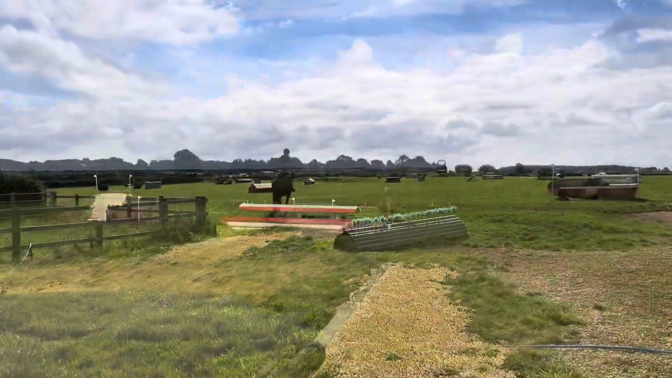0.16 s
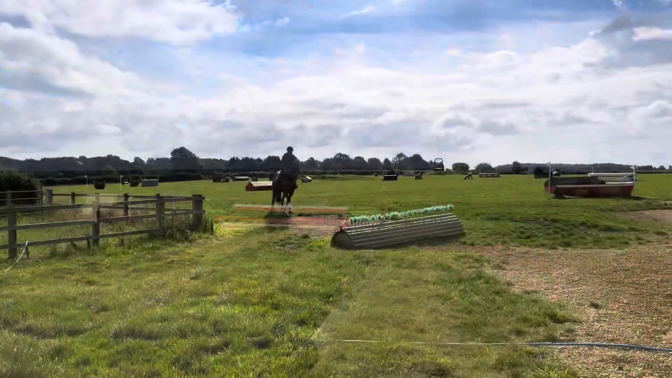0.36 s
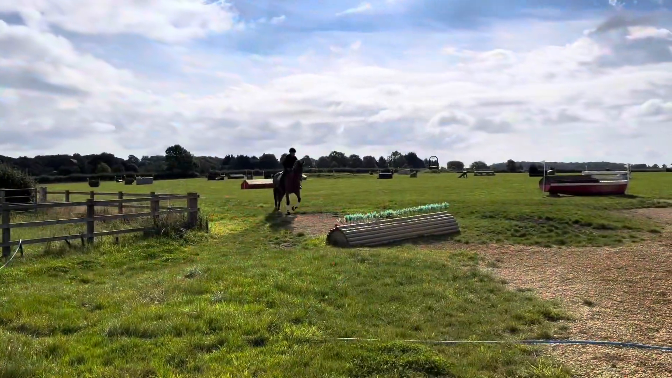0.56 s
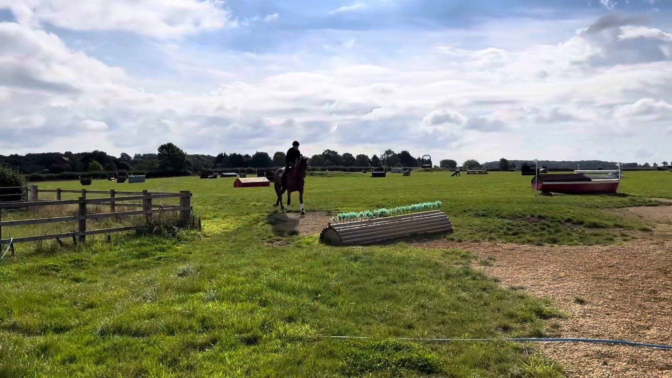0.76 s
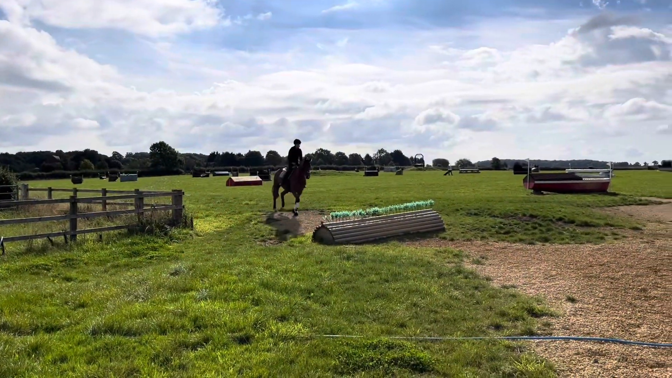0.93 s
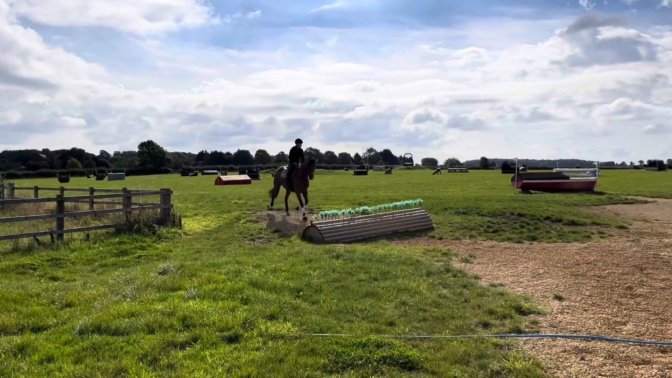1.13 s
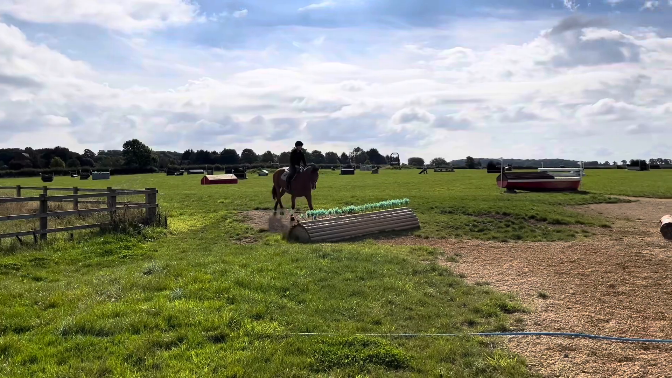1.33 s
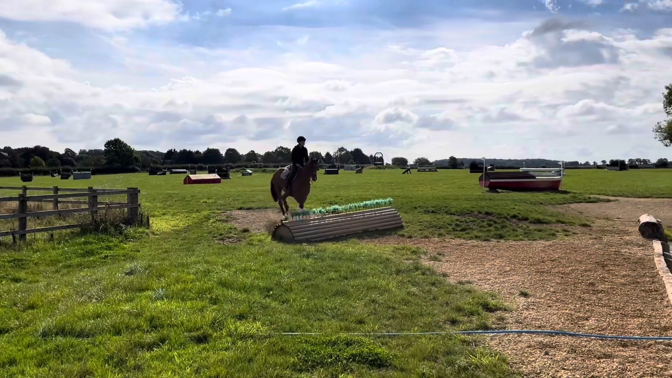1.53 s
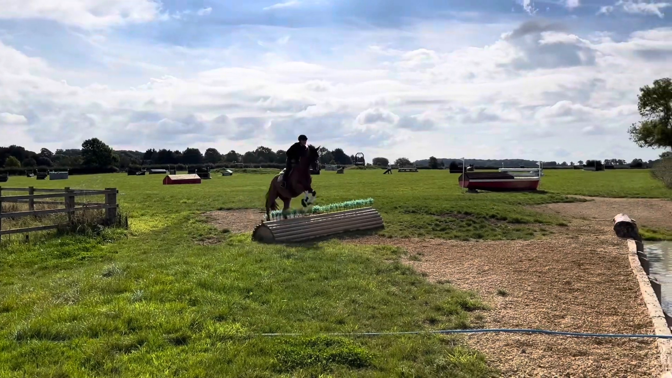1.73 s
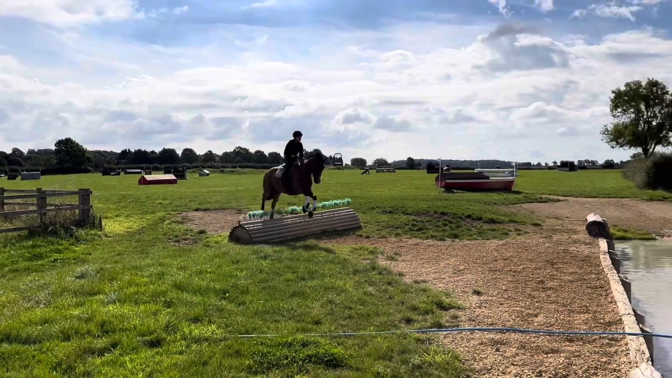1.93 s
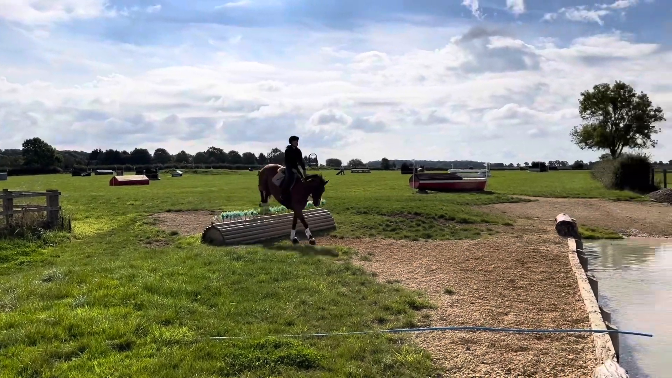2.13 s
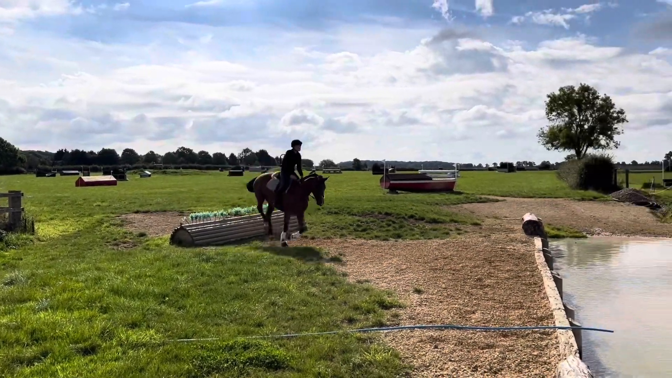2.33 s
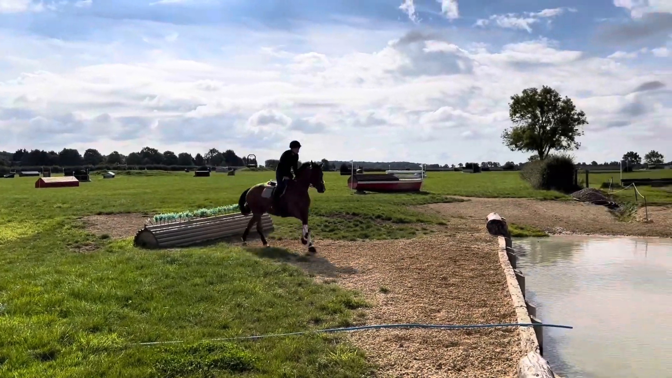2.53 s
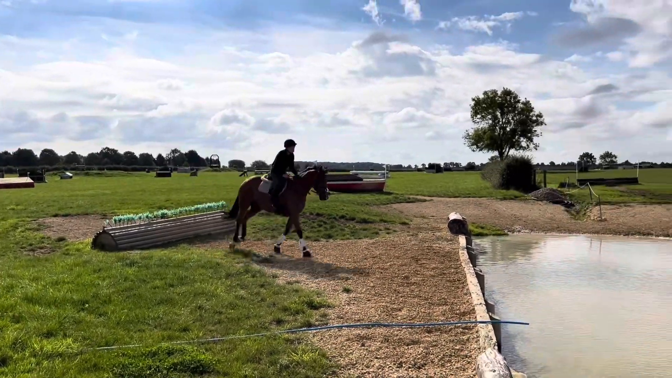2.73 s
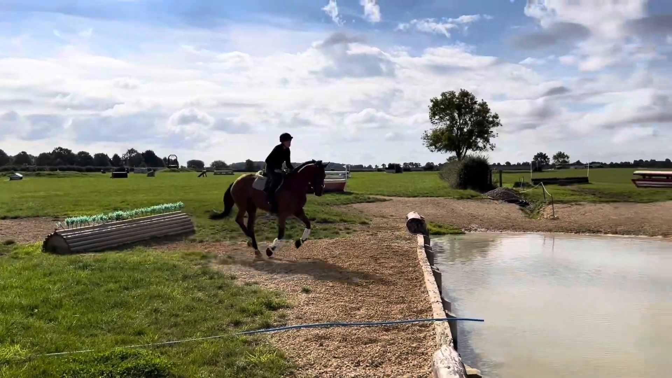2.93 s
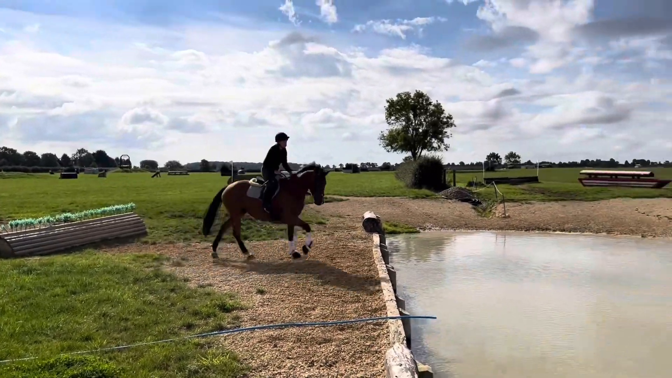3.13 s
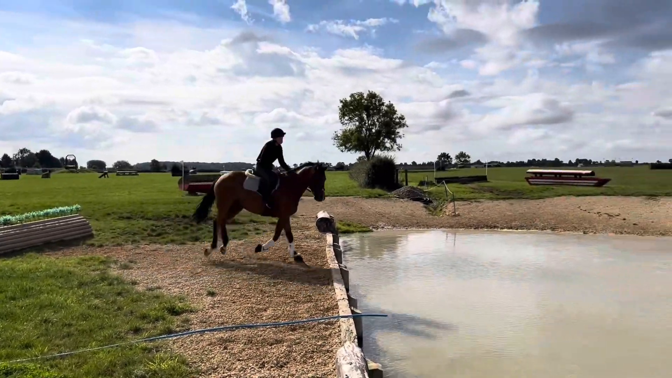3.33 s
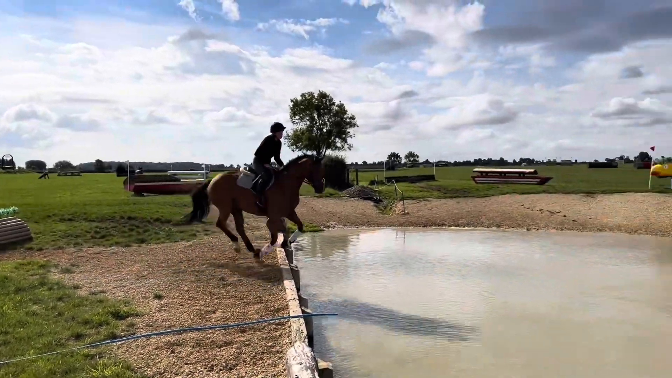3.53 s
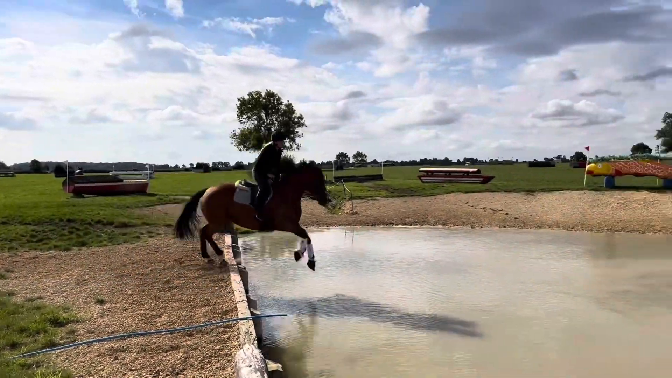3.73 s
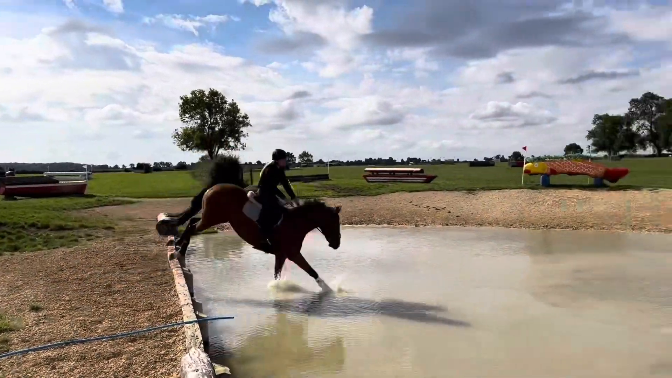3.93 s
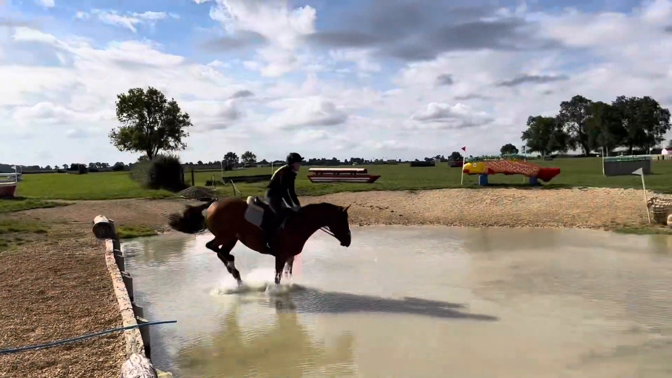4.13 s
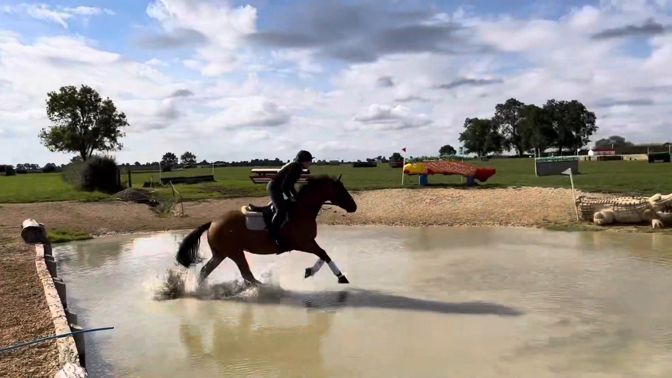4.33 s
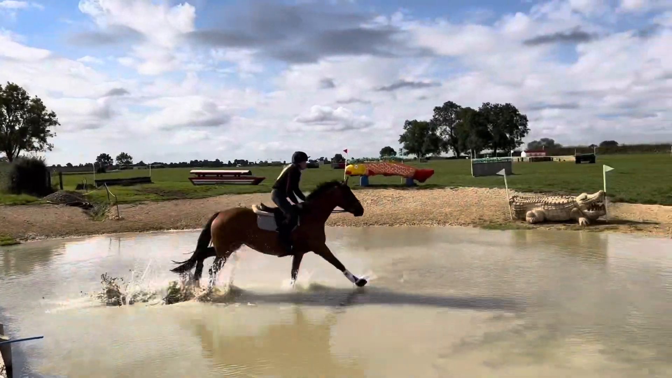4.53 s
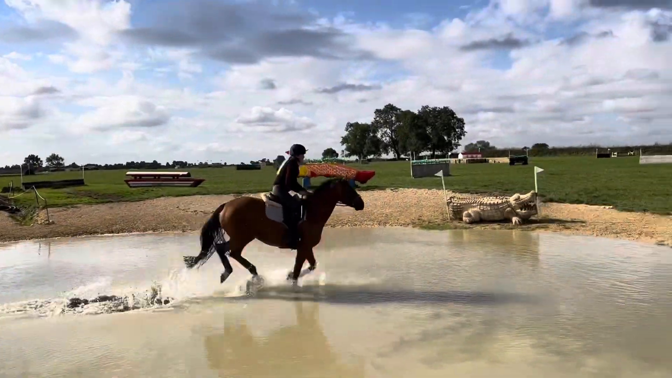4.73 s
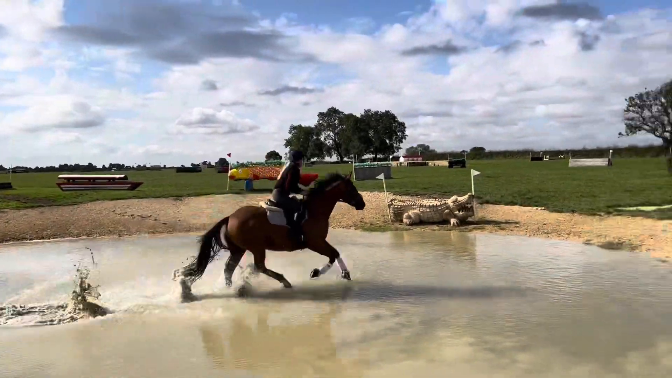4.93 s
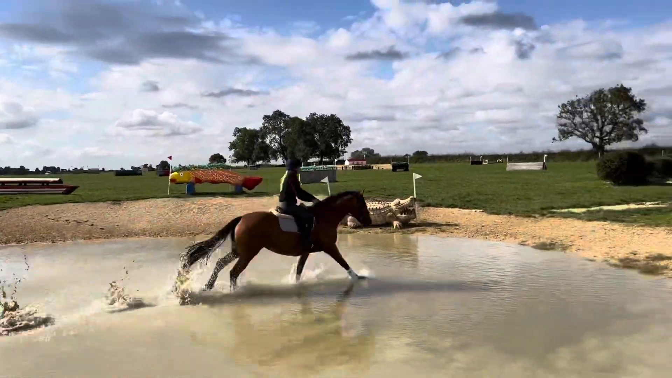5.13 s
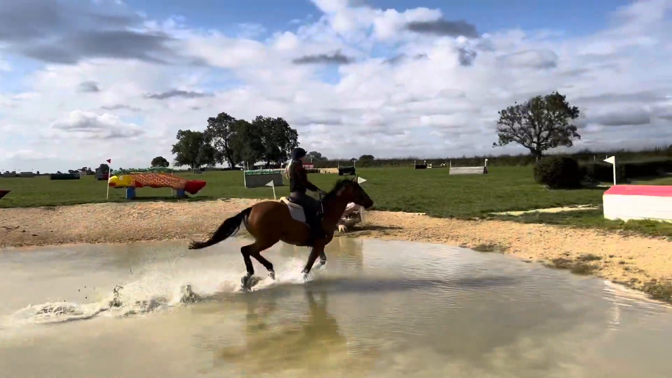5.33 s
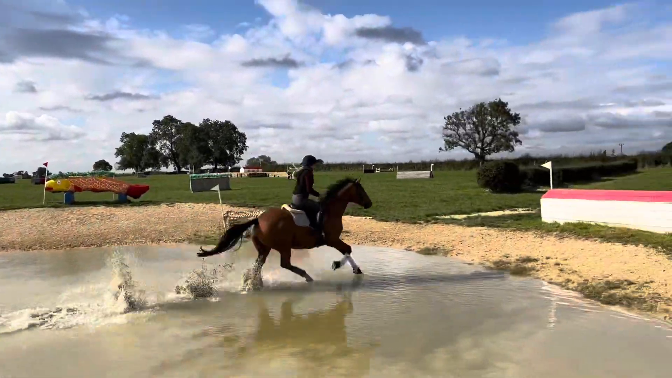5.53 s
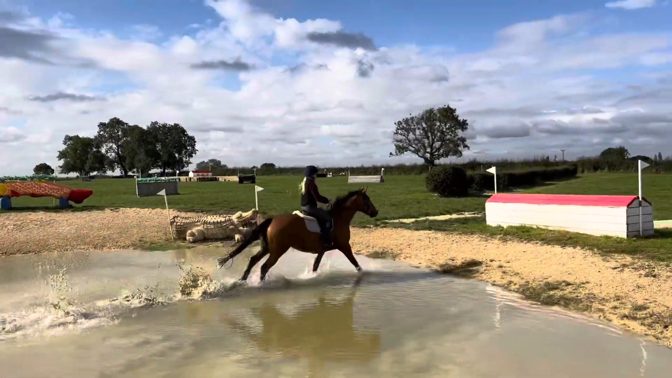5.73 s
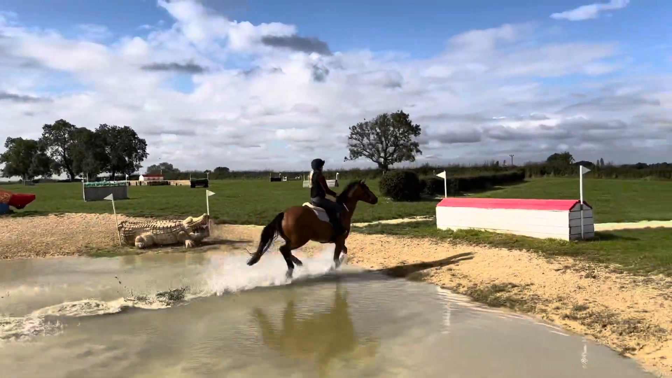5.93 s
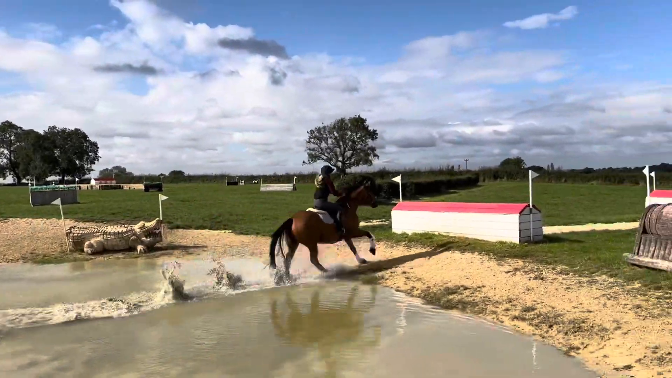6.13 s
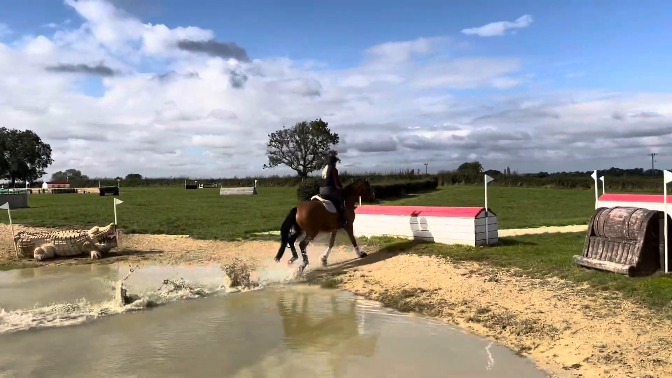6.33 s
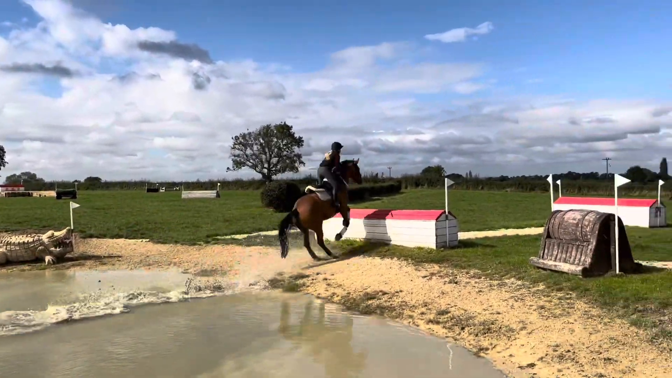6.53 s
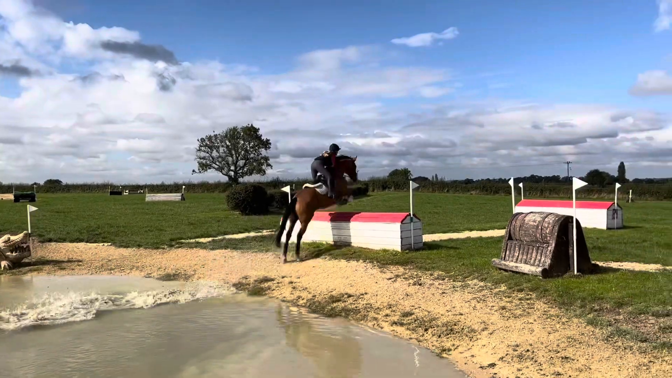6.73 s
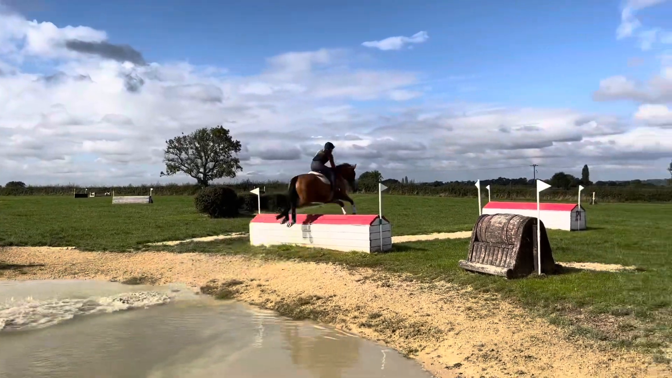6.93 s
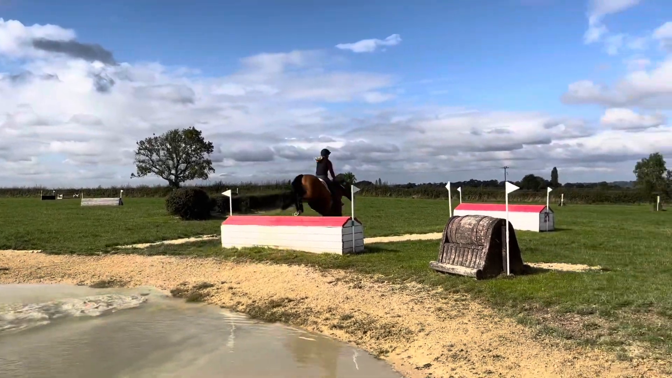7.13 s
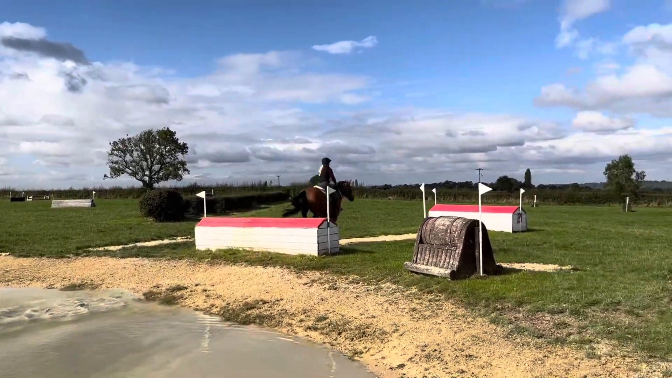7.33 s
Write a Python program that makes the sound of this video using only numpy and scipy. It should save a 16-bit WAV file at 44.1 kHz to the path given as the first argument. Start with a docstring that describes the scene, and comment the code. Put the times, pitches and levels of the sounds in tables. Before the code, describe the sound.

Open air, close wind on a stereo microphone, soft hiss behind. From 0.2 to 1 s low wind flutters and pops. Faint hoofbeats begin around 0.9 s, irregular thuds, dull clops and gravel crunch, with tiny ticks and faint short snorts near 1.5 and 2.2 s. The steps get firmer from 2 to 3.6 s, with loose stones trickling and a sharp click at 3.4 s. A heavy stamp at 3.7 s is followed by a dry, hard timber rap at 3.87 s, then water entry. From 3.95 to 6.3 s hooves crack and slap the shallow pond, air pockets gulp, churned water bubbles and spray patters back continuously. A powerful rumbling gust hits at 5.4-5.9 s, with smaller buffets after 6.3 s. Splashing thins from 6.5 s, droplets die by 7 s, and light hoofbeats land at 7.2 and 7.4 s with a faint snort between.

```python
"""A horse canters over turf and gravel, raps a timber edge, splashes through a shallow pond and leaves it.
Hooves are shaped noise and resonant knocks; stones, drops and bubbles are dense random grains.
On the water each hoof cracks and thumps, air pockets gulp, and spray rains back.
Small sharp clicks are short band-passed snaps; snorts are puffs of noise with a fluttering whistle.
Gusts of wind buffet the microphone as low noise, eddies and pops, over a soft background hiss."""
import sys
import numpy as np
from scipy import signal
from scipy.fft import rfft, irfft, next_fast_len
from scipy.io import wavfile
from scipy.ndimage import uniform_filter1d, map_coordinates

SR = 44100
rng = np.random.default_rng(int(sys.argv[2]) if len(sys.argv) > 2 else 0)


def bounce(signal):
    """Save signal as a 16-bit WAV file at the path given by the first command-line argument."""
    frames = np.transpose(np.atleast_2d(signal))
    limited = np.clip(frames, -1, 1)
    pcm = np.round(limited * 32767).astype(np.int16)
    wavfile.write(sys.argv[1], SR, pcm)


N = 329868  # length [samples]
TOP_HZ = 15500  # upper band limit


def amp(db):
    """Level: decibels become a linear amplitude ratio."""
    return 10 ** (np.asarray(db) / 20)


def unit(x):
    """Normalisation: x is scaled to rms 1."""
    return x / np.sqrt(np.mean(x ** 2) + 1e-20)


def along(points, hz):
    """Logarithmic pitch scale: (frequency, value) points are interpolated over log frequency."""
    f, v = np.transpose(points)
    return np.interp(np.log(hz + 1), np.log(f + 1), v)


def curves(rows):
    """Linear interpolation: one value per sample for each column after the time."""
    s, *columns = np.transpose(rows)
    return [np.interp(np.arange(N) / SR, s, column) for column in columns]


def wobble(rate):
    """Slow random modulation: a smooth curve through random knots, rate of them a second."""
    knots = rng.standard_normal(int(N * rate / SR) + 4)
    return map_coordinates(knots, [np.arange(N) * rate / SR])


def filtered(x, response):
    """Linear filtering: the spectrum of x is multiplied by a response of frequency."""
    m = next_fast_len(N + 8192)
    return irfft(rfft(x, m) * response(np.fft.rfftfreq(m, 1 / SR)), m)[..., :N]


def noise():
    """White noise: two unrelated streams."""
    return rng.standard_normal((2, N))


def coloured(pair, spectrum, alike):
    """Coherence: mid and side shares give two unrelated signals a left-right likeness, a spectrum and rms 1."""
    def turn(hz):
        return np.arccos(np.clip(along(alike, hz), -.99, .99)) / 2

    def mid_and_side(hz):
        return amp(along(spectrum, hz)) * [np.cos(turn(hz)), np.sin(turn(hz))]

    mid, side = filtered(pair, mid_and_side)
    return unit(np.array([mid + side, mid - side]))


def add(track, s, sound):
    """Superposition: a sound is summed into a track from time s on."""
    start = max(0, round(s * SR))
    part = track[..., start:start + sound.shape[-1]]
    part += sound[..., :part.shape[-1]]


def strike(t, attack, t60):
    """Damped excitation: a quick rise and an exponential fall."""
    return (1 - np.exp(-t / attack)) * amp(-60 * t / t60)


def held(t, attack, length, t60):
    """Sustained excitation: a rise, a hold for some length and an exponential fall."""
    return (1 - np.exp(-t / attack)) * amp(-60 * np.maximum(t - length, 0) / t60)


def specks(rate, spread_db):
    """Shot noise: two streams of tiny random impacts, a few much larger than the rest."""
    hit = rng.random((2, N)) < rate / SR
    size = amp(spread_db * np.minimum(rng.exponential(size=(2, N)), 4))
    return unit(hit * np.sign(noise()) * size)


def patchy(pair, depth_db):
    """Local colour: gains vary over short patches of time and pitch, alike in both streams."""
    z = signal.stft(pair, nperseg=512)[2]
    field = uniform_filter1d(rng.standard_normal(z.shape[1:]), size=5, axis=0)
    field = uniform_filter1d(field, size=4, axis=1)
    return signal.istft(z * amp(depth_db * unit(field)), nperseg=512)[1][:, :N]


def grains(count, low_hz, high_hz, cycles, spread_db, glide, size):
    """Granular resonance: bubbles or stones in two streams ring for some cycles; glide bends bubbles upward."""
    when, pitch, chance, phase, port = rng.random((count, 5)).T[:, :, None]
    hz = low_hz * (high_hz / low_hz) ** pitch
    turns = hz * np.arange(size) / SR
    age = turns / cycles
    bent = turns * (1 + glide * np.minimum(age, 2))
    ring = np.sin(2 * np.pi * (bent + phase)) * strike(age, 0.012, 1.0)
    ring *= np.sqrt(hz) * amp(spread_db * np.minimum(-np.log(1 - chance), 3))
    # the second stream lies N samples after the first
    place = (when * (N - size)).astype(int) + np.arange(size) + N * (port > .5)
    return unit(np.bincount(place.ravel(), ring.ravel(), 2 * N).reshape(2, N))


def thump(hz, swell):
    """Pressure pulse: a few cycles sink in pitch, and the envelope peaks after swell nominal cycles."""
    cycles = hz * np.arange(SR // 8) / SR
    age = cycles / swell
    turns = 6 * np.log(1 + cycles / 4) + .04 * rng.standard_normal() * cycles
    return age ** 2 * np.exp(2 * (1 - age)) * np.sin(2 * np.pi * turns)


KNOCK_RISE_S, KNOCK_T60_S = .002, .085  # the horn meets the stones
HORN_WIDTH = 1.29  # band of the knock, as a ratio to each side of its pitch


def clop(hz):
    """Resonant filtering: a hoof rattles over a few stones and rings around one pitch."""
    t = np.arange(SR // 8) / SR
    envelope = strike(t, KNOCK_RISE_S, KNOCK_T60_S)
    contacts = rng.standard_normal(len(t)) * (rng.random(len(t)) < 1800 / SR)
    band = signal.butter(2, [hz / HORN_WIDTH, hz * HORN_WIDTH], "band", fs=SR)
    ring = signal.lfilter(*band, contacts * envelope)
    return unit(ring) * np.sqrt(np.mean(envelope ** 2))


# footfalls on land, levels before the trims below:
# (time [s], gravel crunch [dB], horn knock [dB], soil thud [dB], knock pitch [Hz])
FOOTFALLS = [(0.8705, -48.5, -74, -52, 900), (1.072, -52, -43, -49, 1110), (1.1904, -48, -41, -46, 970),
             (1.2277, -48, -49, -42, 830), (1.448, -53.5, -44, -48, 950), (1.637, -42, -39, -45, 666),
             (1.745, -52, -46, -48, 1010), (2.077, -66, -63, -40, 900), (2.138, -46.5, -49.5, -38, 1000),
             (2.157, -64, -47, -49, 450), (2.2107, -46, -52, -39.5, 1100), (2.313, -58, -45.5, -45.5, 650),
             (2.34, -50.5, -63, -67, 900), (2.4284, -46.5, -36.5, -43.5, 565), (2.535, -42, -43, -50, 1090),
             (2.5828, -44, -40.5, -46, 960), (2.6, -48.5, -47, -54, 850), (2.638, -69, -45, -53, 740),
             (2.77, -46.5, -68, -56, 900), (2.873, -50.5, -54, -37, 900), (3.004, -39.5, -29, -43, 940),
             (3.1045, -36.5, -37.5, -36, 845), (3.141, -44.5, -40, -30.5, 950), (3.211, -70, -48, -65, 900),
             (3.3156, -47, -40, -51, 850), (3.349, -52, -42.5, -41, 980), (3.456, -44.5, -66, -64, 900),
             (3.5434, -52, -42.5, -37, 800), (3.611, -35.5, -49, -39, 900),
             (3.6784, -27, -22.5, -21.5, 790), (3.692, -65, -46, -23.5, 730), (3.734, -54, -48, -30.5, 730),
             (3.821, -27, -37, -40, 850), (7.166, -54, -30.5, -40, 650), (7.404, -43.5, -41, -36, 895)]
# looseness of the ground, from firm turf to the gravel bank: (time [s], level of the rolling stones [dB])
LOOSENESS = [(.6, -5), (1.3, 5.5), (2.7, 4.5), (3.7, 0.5)]
# spectrum of crushed gravel: (frequency [Hz], relative density [dB per Hz])
GRAVEL_SPECTRUM = [(250, -58), (500, 7.5), (1000, 0), (1500, 0), (2200, 1), (3200, -3), (5500, -4),
                   (8500, -6), (12500, -14.5), (15500, -22)]
# spectrum of a hoof on stony ground, also of pebbles: (frequency [Hz], relative density [dB per Hz])
HORN_SPECTRUM = [(120, -6), (300, 3), (560, 2), (800, 4.5), (1150, 2), (1700, -9), (3500, -20), (8000, -40)]
# spectrum of weight landing on soil: (frequency [Hz], relative density [dB per Hz])
THUD_SPECTRUM = [(30, -24), (70, -7), (115, 0), (170, 1), (300, -4), (450, -11), (750, -22), (2000, -50)]
# stereo likeness of the noise, with narrow steps in the treble: (frequency [Hz], left-right likeness [ratio])
LIKENESS = [(300, .85), (900, .92), (2200, .9), (4500, .7), (7400, .7), (7900, .99), (8700, .99),
            (9400, .68), (10700, .7), (11300, .97), (12900, .97), (13800, .5), (14700, .99)]
CRUNCH_RISE_S, CRUNCH_HOLD_S, CRUNCH_T60_S = .0022, .012, .075  # the gravel gives way
ROLL_DB, ROLL_RISE_S, ROLL_T60_S = -23, 0.12, 0.88  # loose stones roll on after each crunch
HORN_DULL_DB = -4.5  # the broad clop under the pitched knock
THUD_RISE_S, THUD_T60_S = 0.0076, 0.13  # the leg takes the weight
SOIL_HZ, SOIL_DELAY_S, SOIL_DB = 77.2, 0.0083, -7  # median pitch of the rebound; level relative to the thud
SOIL_LIMIT = 0.027  # largest rebound of the soil (linear amplitude)
STONE_SHARE = .5  # single stones clacking within the crunch
PEBBLE_DB, PEBBLES_PER_S = 4, 130  # kicked-up pebbles, relative to the rolling stones; rate in each stream


def hooves():
    """Impact: each hoof knocks, crushes gravel and kicks up stones; its weight thuds in soil that springs back."""
    t = np.arange(SR) / SR
    crunch, rolling, knock, clops, weight, soil = np.zeros((6, N))
    for s, crunch_db, knock_db, thud_db, hz in FOOTFALLS:
        add(crunch, s - .001, amp(crunch_db - 5.0) * held(t, CRUNCH_RISE_S, CRUNCH_HOLD_S, CRUNCH_T60_S))
        add(rolling, s, amp(crunch_db + ROLL_DB) * strike(t, ROLL_RISE_S, ROLL_T60_S))
        add(knock, s, amp(knock_db + HORN_DULL_DB) * strike(t, KNOCK_RISE_S, KNOCK_T60_S))
        add(clops, s, amp(knock_db - 3.5) * clop(hz))
        add(weight, s, amp(thud_db) * strike(t, THUD_RISE_S, THUD_T60_S))
        # the soil can only give so far
        give = SOIL_LIMIT * np.tanh(amp(thud_db + SOIL_DB) / SOIL_LIMIT)
        soil_hz = SOIL_HZ * np.exp(0.19 * rng.standard_normal())
        add(soil, s + SOIL_DELAY_S, give * thump(soil_hz, swell=1.9))
    rolling = rolling * amp(curves(LOOSENESS)[0])
    tumble = amp(3 * wobble(40))
    clacks = grains(count=5000, low_hz=900, high_hz=9000, cycles=11, spread_db=3, glide=0, size=500)
    grit = patchy(specks(rate=1500, spread_db=4.3), depth_db=3.5)
    stones = unit(grit + STONE_SHARE * clacks + .45 * noise())
    gravel = np.hypot(crunch, rolling * tumble) * coloured(stones, GRAVEL_SPECTRUM, LIKENESS)
    patter = unit(patchy(specks(rate=PEBBLES_PER_S, spread_db=2), depth_db=4))
    pebbles = amp(PEBBLE_DB) * rolling * coloured(patter, HORN_SPECTRUM, LIKENESS)
    horn = knock * coloured(patchy(noise(), depth_db=3), HORN_SPECTRUM, LIKENESS)
    thud = weight * coloured(noise(), THUD_SPECTRUM, [(150, 0.97)])
    return gravel + pebbles + clops + horn + soil + thud


# a leg drives through the pond: (time [s], churned air [dB], thrown spray [dB], length [s])
SURGE_EVENTS = [(3.919, -30, -40, 0.031), (3.999, -42, -40, 0.032), (4.122, -34.5, -32.5, 0.018),
                (4.15, -27, -32.5, 0.016), (4.243, -26.5, -31, 0.015), (4.422, -27, -40, 0.039),
                (4.575, -34, -36.5, 0.072), (4.665, -29.5, -31.5, 0.048), (4.828, -34, -32.5, 0.072),
                (4.909, -24.5, -50, 0.024), (4.994, -25.5, -33.5, 0.076), (5.237, -27, -37, 0.12),
                (5.613, -26, -39.5, 0.068), (5.918, -38, -28, 0.098), (6.059, -31, -27, 0.037),
                (6.142, -28.5, -27.5, 0.034), (6.319, -36, -36, 0.023)]
# the wake rains back into the pond and thins out once the horse has left it: (time [s], level [dB])
WAKE_SHOWER = [(3.88, -45), (4.08, -47.5), (4.2, -31.5), (4.38, -37), (4.55, -38.5), (4.75, -32),
               (4.96, -34), (5.13, -35), (5.35, -31.5), (5.95, -32), (6.3, -36.5), (6.68, -37.5),
               (7, -49.5), (7.48, -63)]
# spectrum of air churned under the surface: (frequency [Hz], relative density [dB per Hz])
CHURN_SPECTRUM = [(60, -60), (100, -19), (145, -1.5), (230, 5.5), (420, -0.5), (560, -4.5), (780, -3),
                  (950, -5), (1150, -6.5), (1600, -18), (4000, -46)]
# spectrum of falling drops: (frequency [Hz], relative density [dB per Hz])
SPRAY_SPECTRUM = [(300, -21), (600, 1), (830, 3), (980, -3.5), (1150, -6.5), (1400, -9), (1800, -4.5),
                  (2200, -12), (2550, -5.5), (2950, -9.5), (4000, -11.5), (6000, -13.5), (8300, -15.5),
                  (11000, -18), (14000, -23), (15500, -28)]
SURGE_RISE_S, SURGE_T60_S = 0.013, 0.19  # the churning builds up and dies away
THROW_RISE_S, THROW_T60_S = 0.0061, 0.11  # so does the sheet of spray
WAKE_CHURN_DB = -4  # bubbling of the wake, relative to its spray
CLUMPS_PER_S, CLUMP_GAIN, CLUMP_FALL_S = 32, .75, .0025  # lumps of thrown water smack back into the pond


def water():
    """Bubble resonance and droplet impact: legs churn air under the surface and throw spray that falls back."""
    t = np.arange(SR) / SR
    stir, thrown = np.zeros((2, N))
    for s, churn_db, spray_db, length in SURGE_EVENTS:
        add(stir, s, amp(churn_db) * held(t, SURGE_RISE_S, length, SURGE_T60_S))
        add(thrown, s, amp(spray_db) * held(t, THROW_RISE_S, length, THROW_T60_S))
    entry = np.interp(np.arange(N) / SR, [3.86, 3.89], [0, 1])
    wake = entry * amp(curves(WAKE_SHOWER)[0])
    pockets = grains(count=2200, low_hz=133, high_hz=1300, cycles=12, spread_db=2.8, glide=.33, size=1500)
    churn = coloured(unit(pockets + .42 * noise()), CHURN_SPECTRUM, [(400, .8)])
    drops = grains(count=13000, low_hz=900, high_hz=13000, cycles=15, spread_db=2.5, glide=.25, size=350)
    fall = .5 * drops + .65 * specks(rate=3800, spread_db=3.7) + .55 * noise()
    fall = patchy(fall, depth_db=1.9)
    spray = unit(amp(.9 * wobble(45)) * coloured(fall, SPRAY_SPECTRUM, LIKENESS))
    clumps = (rng.random(N) < CLUMPS_PER_S / SR) * rng.uniform(.3, 1, N)
    smacks = signal.lfilter([1], [1, -np.exp(-1 / (CLUMP_FALL_S * SR))], clumps)
    spray = unit(spray * (1 + CLUMP_GAIN * smacks))
    return np.hypot(stir, amp(WAKE_CHURN_DB) * wake) * churn + np.hypot(thrown, wake) * spray


# hooves that hit the water flat, cavity levels before the trims below:
# (time [s], crack [dB], cavity [dB], nominal cavity pitch [Hz])
SLAP_EVENTS = [(3.9615, -17, -8, 556), (4.113, -45, -13, 174), (4.125, -29, -8.5, 248),
               (4.157, -24, -11, 550), (4.183, -25, -29, 395), (4.2425, -27, -9, 295),
               (4.277, -17, -15.5, 340), (4.3142, -19.5, -24, 516), (4.415, -19, -9.5, 320),
               (4.598, -14.5, -11, 880), (4.994, -10.5, -13.5, 280), (5.161, -22.5, -13.5, 266),
               (5.2427, -22, -24, 504), (5.2684, -25, -11, 330), (5.5962, -17.5, -17, 410),
               (5.63, -22, -23, 700), (5.688, -25, -20, 790), (5.758, -25, -16, 820), (5.858, -20, -6, 490),
               (5.982, -18, -29, 700), (6.049, -25, -24, 700), (6.1, -26, -17, 605), (6.154, -21, -15, 268),
               (6.895, -31.5, -29, 600)]
# spectrum of a hoof on the surface: (frequency [Hz], relative density [dB per Hz])
CRACK_SPECTRUM = [(300, -34), (700, 6.5), (1200, -0.5), (2500, -3.5), (5500, -11), (9000, -16),
                  (15000, -29.5)]


def slaps():
    """Cavity resonance: a hoof cracks the surface, then the air cavity under it thumps and breaks up."""
    t = np.arange(SR // 8) / SR
    cracks, cavities, collapse = np.zeros((3, N))
    for s, db, cavity_db, hz in SLAP_EVENTS:
        add(cracks, s - .001, amp(db) * strike(t, .001, .026))
        add(cavities, s + 0.0011, amp(cavity_db - 12.0) * thump(hz, swell=2.1))
        add(collapse, s + 0.0014, amp(cavity_db - 9.5) * strike(t, 0.00084, 0.054))
    surface = cracks * coloured(noise(), CRACK_SPECTRUM, LIKENESS)
    breakup = collapse * coloured(noise(), CHURN_SPECTRUM, LIKENESS)
    return cavities + surface + breakup


# big air pockets gulp behind the legs: (time [s], level [dB], starting pitch [Hz])
GULP_EVENTS = [(4.118, -17.5, 188.4), (4.153, -18.5, 205), (4.156, -22, 563), (4.244, -12, 824),
               (4.247, -19.5, 188.3), (4.313, -26, 810), (4.419, -26, 257), (4.698, -19, 740),
               (4.906, -18, 805), (4.923, -19, 258.5), (4.997, -24.5, 252), (5.026, -18, 544),
               (5.034, -22, 804), (5.304, -18.5, 261), (5.857, -25, 790)]
GULP_CYCLES, GULP_RISE_S = 40.5, 0.0022  # cycles at the starting pitch to fall by 60 dB; swell
GULP_GLIDE = .12  # mean rise in pitch over that life, as a share


def gulps():
    """Bubble resonance: a large trapped air pocket rings unsteadily and rises in pitch as it comes up."""
    t = np.arange(SR // 4) / SR
    out = np.zeros(N)
    for s, db, hz in GULP_EVENTS:
        life = GULP_CYCLES / hz
        turns = hz * t * (1 + GULP_GLIDE * np.minimum(t / life, 1))
        add(out, s, amp(db) * strike(t, GULP_RISE_S, life) * np.sin(2 * np.pi * turns))
    return out * amp(2 * wobble(150))


RAP_S, RAP_RISE_S = 3.8668, 0.0013  # a hind hoof raps the timber edge of the pond at take-off
# modes of the beam: (frequency [Hz], level [dB], 60 dB decay time [s])
TIMBER_MODES = [(250, -3, 0.021), (360, 0, 0.022), (750, 1.5, 0.024), (1150, -4, .014), (1680, -9.5, 0.015)]


def timber():
    """Modal damping: one dry, hard rap; the beam lies in the ground, so its modes die at once."""
    t = np.arange(SR // 8) / SR
    out = np.zeros(N)
    for hz, db, t60 in TIMBER_MODES:
        add(out, RAP_S, amp(db) * strike(t, RAP_RISE_S, t60) * np.sin(2 * np.pi * hz * t))
    return out


def without_bass(x):
    """Low cut: the beam, the cavities and the air pockets carry no deep bass."""
    return signal.sosfilt(signal.butter(3, 110, "high", fs=SR, output="sos"), x)


# small sharp clicks: tack, hoof ticks, pebbles and smacking drops; snap levels before the trim below:
# (time [s], snap [dB], centre of the snap [Hz], knock [dB])
CLICK_EVENTS = [(.54, -48.5, 4000, -70), (.851, -46, 8000, -70), (1.007, -42.5, 7000, -61),
                (1.14, -37.5, 11000, -39.5), (1.189, -35.5, 6860, -52), (2.467, -42, 3000, -38),
                (2.557, -38, 2000, -27), (2.692, -40.5, 2170, -34), (2.726, -54, 5000, -63),
                (2.898, -32.5, 12000, -43), (3.266, -42, 4000, -25.5), (3.294, -41, 6000, -46),
                (3.391, -39, 8000, -37), (3.4339, -19, 6800, -56), (3.672, -46, 4000, -19),
                (3.8643, -17, 3740, -30), (5.349, -22.5, 10000, -50), (6.449, -42, 9000, -50),
                (7.105, -33.5, 2450, -48)]
CLICK_RISE_S, CLICK_T60_S = 0.00031, 0.026  # the snap of the contact
CLICK_KNOCK_HZ, CLICK_KNOCK_T60_S = 880, 0.0093  # the dull ring under the snap: median pitch, decay


def clicks():
    """Brief contact: each small sharp click is a band-limited snap with a very short dull ring."""
    t = np.arange(SR // 16) / SR
    out = np.zeros((2, N))
    for s, snap_db, hz, knock_db in CLICK_EVENTS:
        band = signal.butter(1, [hz / 2, min(hz * 2, TOP_HZ)], "band", fs=SR)
        # mostly shared noise, with a little of its own on each side
        contact = rng.standard_normal(len(t)) + 0.24 * rng.standard_normal((2, len(t)))
        snap = unit(signal.lfilter(*band, contact))
        ring_hz = CLICK_KNOCK_HZ * np.exp(0.17 * rng.standard_normal())
        ring = np.sin(2 * np.pi * ring_hz * t)
        add(out, s, amp(snap_db - 5.5) * strike(t, CLICK_RISE_S, CLICK_T60_S) * snap)
        add(out, s, amp(knock_db) * strike(t, CLICK_RISE_S, CLICK_KNOCK_T60_S) * ring)
    return out


# the horse blows: (time [s], rasp [dB], length [s], whistle [dB], whistle pitch [Hz])
SNORT_EVENTS = [(1.478, -46.5, 0.015, -46, 1685), (1.782, -60, 0.056, -66, 1870),
                (2.225, -48.5, 0.016, -53, 1860), (2.834, -51, 0.031, -63, 1990),
                (7.293, -56, 0.011, -49.5, 1725)]
# resonances of the nostrils: (multiple of the whistle's pitch [ratio], level [dB])
NOSTRIL_MODES = [(1, 5), (1.72, -5), (.76, -14)]
# spectrum of the rush of air: (frequency [Hz], relative density [dB per Hz])
RASP_SPECTRUM = [(300, -27), (800, 8), (2000, -3), (3200, -2.5), (4500, -13), (9000, -21)]
NOSTRIL_WIDTH_HZ = 130  # cutoff of the flutter in level and phase
WHISTLE_LAG_S, WHISTLE_SAG_PER_S = .01, 2.4  # the whistle follows the rasp and sinks by this share a second


def snorts():
    """Turbulent flow: short blows of air rasp broadly, then whistle hoarsely and sink in the nostrils."""
    t = np.arange(-SR // 8, SR // 8) / SR
    flow, whistles = np.zeros((2, N))
    narrow = signal.butter(2, NOSTRIL_WIDTH_HZ, fs=SR)
    for s, rasp_db, length, whistle_db, hz in SNORT_EVENTS:
        puff = np.exp(-.5 * (t / length) ** 2)
        turns = np.cumsum(hz * (1 - WHISTLE_SAG_PER_S * t)) / SR
        add(flow, s + t[0], amp(rasp_db) * puff)
        for multiple, db in NOSTRIL_MODES:
            flutter, drift = unit(signal.lfilter(*narrow, rng.standard_normal((2, len(t)))))
            tone = .85 * amp(3 * flutter) * np.sin(2 * np.pi * multiple * turns + 1.4 * drift)
            add(whistles, s + WHISTLE_LAG_S + t[0], amp(whistle_db + db) * puff * tone)
    rushing = patchy(noise(), depth_db=3)[0] * amp(3 * wobble(120))
    return whistles + flow * unit(filtered(rushing, lambda hz: amp(along(RASP_SPECTRUM, hz))))


# the two microphone ports hear the horse out of step: (frequency [Hz], phase by which left leads [radians])
PORT_PHASE = [(300, 0), (800, .55), (1200, .6), (1470, 2.6), (1750, .15), (3000, .9), (4900, .5),
              (6600, -.95), (7800, -3.1), (8800, -3.2), (11000, -6.25), (13400, -6.5), (14500, -9.4)]


def ports(x):
    """Stereo phase difference: opposite phase shifts at the two ports, and the left one a little brighter."""
    # (frequency [Hz], half of the level difference [dB])
    left_db = [(300, 0.05), (1300, 0.15), (4400, 1.7), (8000, 0.043)]

    def half(hz):
        return amp(along(left_db, hz)) * np.exp(.5j * along(PORT_PHASE, hz))

    return filtered(x, lambda hz: np.array([half(hz), 1 / half(hz)]))


# strength of the wind, with one big gust over the pond: (time [s], rumble level [dB])
WIND_STRENGTH = [(0, -48), (.08, -49), (.15, -45.5), (.22, -31.5), (.65, -35), (.8, -42), (.95, -40),
                 (1.15, -44.5), (1.35, -51.5), (1.55, -59.5), (2, -54.5), (2.27, -44.5), (2.5, -64),
                 (3.15, -51), (3.5, -57), (4.05, -50), (4.2, -37.5), (5.05, -38), (5.3, -29), (5.44, -21.5),
                 (5.49, -18), (5.57, -17.5), (5.65, -17), (5.71, -18), (5.82, -18), (5.97, -30),
                 (6.6, -35.5), (6.95, -31.5), (7.48, -43)]
# the strongest eddies that hit the microphone, before the trims below: (time [s], level [dB], length [s])
EDDY_EVENTS = [(0.013, -39.5, 0.1), (0.186, -22, 0.033), (0.257, -26, 0.043), (0.425, -22, 0.023),
               (0.517, -23, 0.04), (0.562, -24.5, 0.026), (0.614, -26.5, 0.061), (0.678, -22, 0.016),
               (0.864, -27.5, 0.038), (0.989, -32, 0.011), (5.461, -14, 0.048), (5.515, -10.5, 0.047),
               (5.686, -9.5, 0.017), (5.717, -8.5, 0.029), (5.8, -11, 0.044), (5.879, -17, 0.065),
               (6.26, -22.5, 0.08), (6.323, -17, 0.066), (6.423, -21.5, 0.056), (6.807, -25, 0.019),
               (6.909, -27, 0.029), (6.97, -23.5, 0.034), (7.056, -27, 0.025), (7.185, -27, 0.087)]
# eddies that break right on the port with a pop: (time [s], peak level [dB], nominal pitch [Hz])
POP_EVENTS = [(0.192, -26, 500), (0.199, -22, 112), (0.342, -25.5, 81), (.43, -27, 430), (0.523, -25, 440),
              (.272, -25.5, 397), (.68, -23, 396), (.876, -28.5, 362), (1.094, -30.5, 74),
              (2.238, -35, 141), (3.377, -34, 91.4), (5.462, -10, 147), (5.508, -9, 103), (5.55, -10, 106),
              (5.688, -11, 117), (5.724, -7, 337), (5.802, -11.5, 92.5), (6.326, -14, 404),
              (6.45, -14.5, 329), (6.704, -26.5, 360), (6.763, -22, 288), (6.806, -27.5, 238),
              (6.977, -21.5, 228), (7.169, -26, 400)]
# spectrum of the steady wind: (frequency [Hz], relative density [dB per Hz])
RUMBLE_SPECTRUM = [(15, -32), (30, -14), (48, -2), (65, 0), (90, -1.5), (125, -4), (220, -13), (450, -28),
                   (1000, -46), (3000, -72), (6000, -120)]
# spectrum of the eddies: (frequency [Hz], relative density [dB per Hz])
BUFFET_SPECTRUM = [(25, -28.5), (70, 3.5), (160, 0.5), (300, -2), (550, -14.5), (1000, -29), (2000, -60),
                   (5000, -123.5)]
# background hiss: (time [s], level [dB])
HISS_LEVEL = [(0, -61.5), (.35, -65), (.8, -57.5), (1.4, -65), (2, -60), (2.8, -59.5), (7.48, -51)]
# spectrum of the background hiss, a soft breeze below and a faint residue in the top treble:
# (frequency [Hz], relative density [dB per Hz])
HISS_SPECTRUM = [(60, 0.5), (130, -5), (480, -8), (1000, -9.5), (1500, -16), (2200, -20.5), (4000, -30.5),
                 (9000, -41.5), (13500, -37), (15500, -59)]


def wind():
    """Turbulence: a lumpy rumble follows the wind, with sharper eddies and pops on top and a soft hiss behind."""
    t = np.arange(SR // 3) / SR
    eddies, pops = np.zeros(N), np.zeros(N)
    for s, db, length in EDDY_EVENTS:
        add(eddies, s - .002, amp(db - 1.5) * (1 - np.exp(-t / 0.0033)) * np.exp(-(t / length) ** 2))
    for s, db, hz in POP_EVENTS:
        add(pops, s, amp(db) * thump(hz, swell=1.35))
    lumps = amp(3.2 * wobble(18)) * coloured(noise(), RUMBLE_SPECTRUM, [(60, 0.85)])
    rumble = amp(curves(WIND_STRENGTH)[0]) * unit(lumps)
    flutter = amp(1.16 * wobble(110)) * coloured(noise(), BUFFET_SPECTRUM, [(200, 0.49)])
    buffet = 1.006 * eddies * unit(flutter)
    gusts = .6 * np.tanh((rumble + buffet + pops) / .6)  # the strongest gusts saturate softly
    rustle = patchy(noise() + .6 * specks(rate=120, spread_db=3), depth_db=2.5)
    hiss_gain = amp(curves(HISS_LEVEL)[0] + 0.87 * wobble(5.9))
    hiss = hiss_gain * coloured(rustle, HISS_SPECTRUM, [(1000, 0.16)])
    return gusts + hiss


def scene():
    """Superposition: the horse passes in the open air while the wind blows on the microphone."""
    splashes = without_bass(slaps() + gulps() + timber())
    horse = hooves() + water() + splashes + clicks() + snorts()
    return ports(horse) + wind()


def record(dry):
    """Band limiting: a steep low-pass, as the camera keeps almost nothing above its band limit."""
    return filtered(dry, lambda hz: 1 / np.sqrt(1 + (hz / TOP_HZ) ** 200))


dry = scene()
out = record(dry)
bounce(out)
```